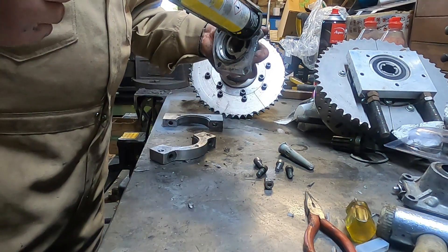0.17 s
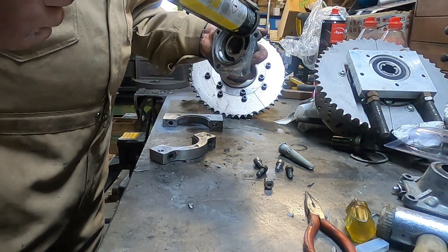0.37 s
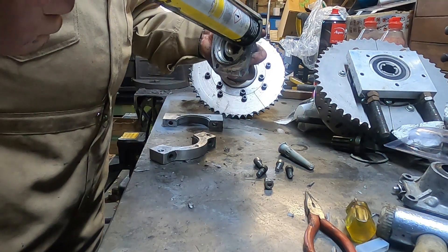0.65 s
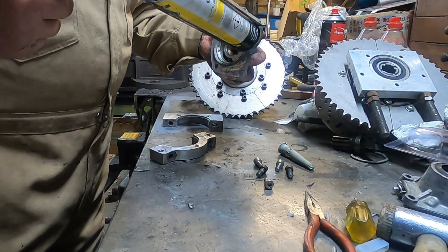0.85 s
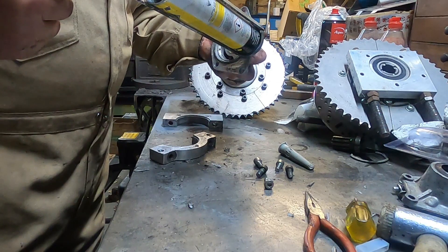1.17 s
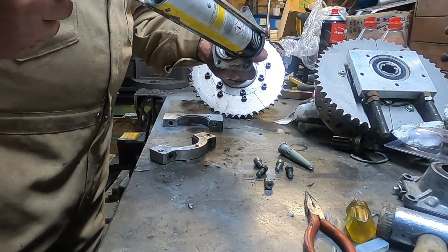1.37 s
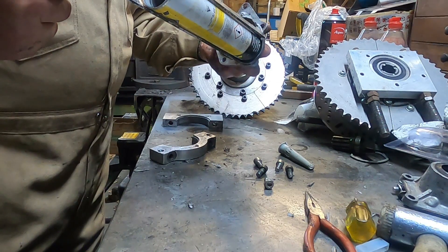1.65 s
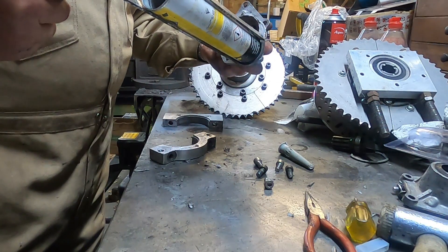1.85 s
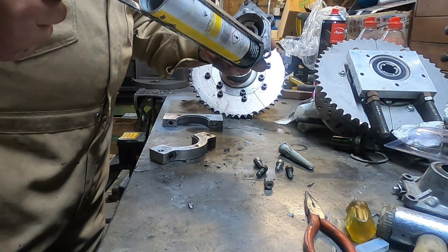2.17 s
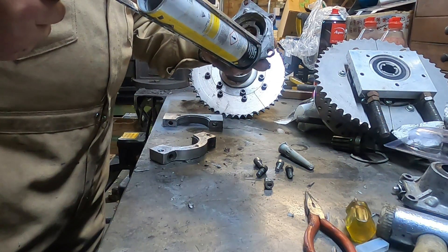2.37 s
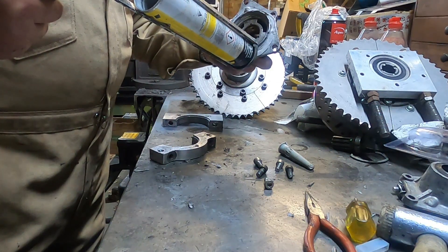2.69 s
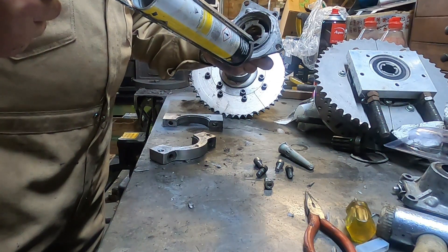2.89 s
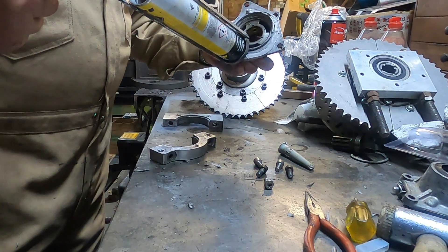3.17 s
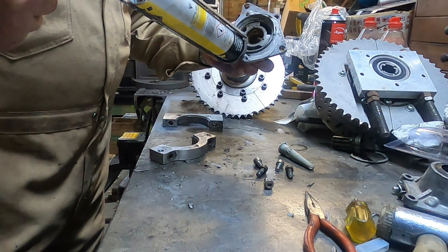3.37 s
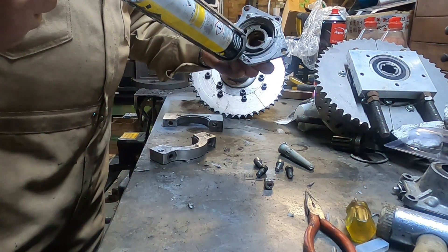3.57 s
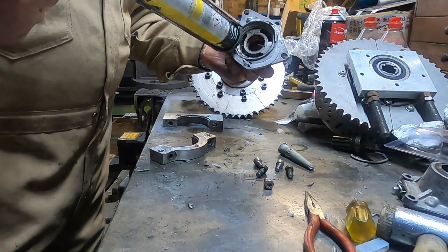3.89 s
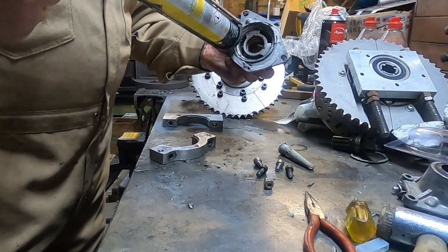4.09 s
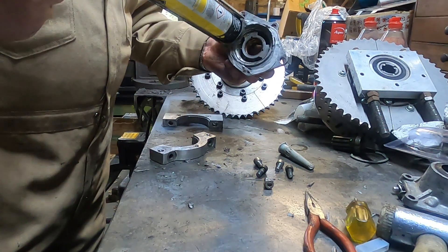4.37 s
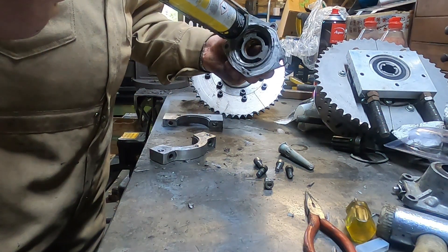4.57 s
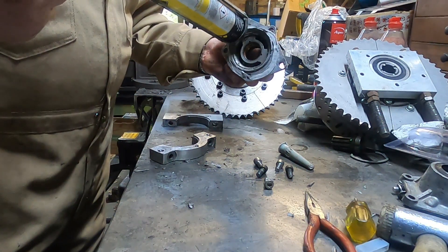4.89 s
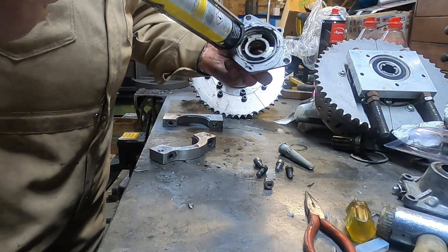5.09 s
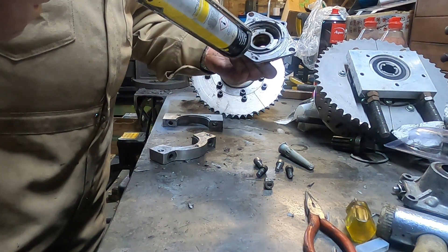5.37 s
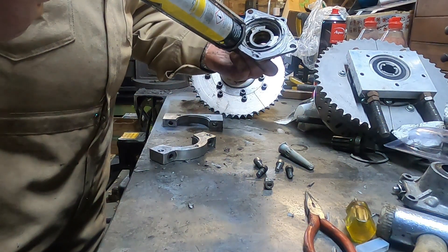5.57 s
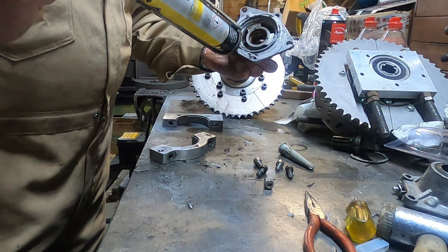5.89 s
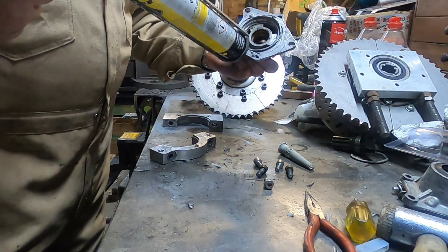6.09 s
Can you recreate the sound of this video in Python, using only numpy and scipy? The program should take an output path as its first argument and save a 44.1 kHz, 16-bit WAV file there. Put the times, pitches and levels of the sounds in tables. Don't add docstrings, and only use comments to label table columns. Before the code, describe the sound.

Close metallic clicks, short rod scrapes and dull barrel knocks from a hand-worked caulking gun, over distant sparrows, traffic rumble and room air.

```python
import sys
import numpy as np
from scipy import signal
from scipy.fft import rfft, irfft, next_fast_len
from scipy.io import wavfile
from scipy.ndimage import uniform_filter1d, map_coordinates

SR = 44100
rng = np.random.default_rng(int(sys.argv[2]) if len(sys.argv) > 2 else 0)


def magnitude_from_level(level_db):
    exponent = np.asarray(level_db, float) / 20
    return 10 ** exponent


def wav_record(signal):
    frames = np.transpose(np.atleast_2d(signal))
    bounded = np.clip(frames, -1, 1)
    quanta = np.round(bounded * 32767).astype(np.int16)
    wavfile.write(sys.argv[1], SR, quanta)


N = 275184


def unit(x):
    return x / np.sqrt(np.mean(x ** 2) + 1e-20)


def along(points, hz):
    f, v = np.transpose(points)
    return np.interp(np.log(hz + 1), np.log(f + 1), v)


def curves(rows):
    s, *cols = np.transpose(rows)
    t = np.arange(N) / SR
    inside = 1. * (t >= s[0]) * (t <= s[-1])
    return [np.interp(t, s, c) for c in cols] + [uniform_filter1d(inside, size=600)]


def wobble(rate):
    knots = rng.standard_normal(int(N * rate / SR) + 4)
    return map_coordinates(knots, [np.arange(N) * rate / SR])


def filtered(x, response):
    m = next_fast_len(N + SR // 2)
    return irfft(rfft(x, m) * response(np.fft.rfftfreq(m, 1 / SR)), m)[..., :N]


def ring(x, modes, order=1):
    def response(f):
        h = 0
        for k, (center, width, db) in enumerate(modes):
            resonance = 1j * f * width / (center * center - f * f + 1j * f * width)
            h = h + (-1) ** k * magnitude_from_level(db) * resonance
        u = f / (1.41 * modes[-1][0])
        h = h ** order / (1 - u * u + 1.5j * u) ** 2
        return h / np.sqrt(np.mean(abs(h) ** 2))
    return filtered(x, response)


def rush(spectrum, alike, patchy_db):
    z = signal.stft(rng.standard_normal((2, N)), nperseg=512)[2]
    field = uniform_filter1d(rng.standard_normal(z.shape[1:]), size=6, axis=0)
    field = uniform_filter1d(field, size=14, axis=1)
    pair = signal.istft(z * magnitude_from_level(patchy_db * unit(field)), nperseg=512)[1][:, :N]
    turn = np.arccos(np.clip(alike, -1, 1)) / 2
    colored = filtered(pair, lambda hz: magnitude_from_level(along(spectrum, hz)))
    mid, side = colored * [[np.cos(turn)], [np.sin(turn)]]
    return unit(np.array([mid + side, mid - side]))


def walls(x, decay, delay, alike, rise):
    out, step = np.zeros((2, N + SR)), SR // 4
    for start in range(0, N, step):
        hz, t, z = signal.stft(rng.standard_normal((2, SR // 3)), SR, nperseg=128)
        envelope = (1 - np.exp(-t / rise)) * magnitude_from_level(-60 * t / along(decay, hz)[:, None])
        tail = signal.istft(z * envelope, SR, nperseg=128)[1]
        tail[1] = alike * tail[0] + np.sqrt(abs(1 - alike ** 2)) * tail[1]
        wet = signal.fftconvolve(x[None, start:start + step], tail / np.linalg.norm(tail[0]), axes=1)
        out[:, start + round(delay * SR):][:, :wet.shape[1]] += wet
    return out[:, :N]


def plate(events, parts, edge_fall_db):
    force, t = np.zeros((4, 2, N + SR)), np.arange(SR // 40) / SR
    for s, db, barrel_db, frame_db, edge_db, ms in events:
        chatter = (1 - np.exp(-t / 0.00034)) / (1 + (t * 1000 / max(ms, 1)) ** 6)
        falls_db = [-700 * t + barrel_db, -1100 * t + frame_db, -800 * t, -edge_fall_db * t + edge_db + 6.5]
        shape = magnitude_from_level(db - 4.5) * chatter * magnitude_from_level(falls_db)
        i = round(s * SR)
        force[:, 0, i:][:, :len(t)] += shape * rng.standard_normal((4, len(t)))
        force[:, 1, i] = np.linalg.norm(shape, axis=1)
        force[:, 0, i] = force[:, 1, i] * [0.43, 0.13, 0.39, 0.74]
    return sum(ring(f[:, :N], part) for f, part in zip(force, parts))


def gripping_plate():
    # start_s, rod_ring_peak_db, frame_db (relative), edge_db (relative)
    snaps = [(0.602, -29.5, -12.5, -10.5), (1.0217, -32, -3.5, -4), (1.3887, -30.5, -1.5, -6),
             (1.9833, -23.5, -9.5, -9), (2.0367, -20, -7.5, -7.5), (3.0955, -25.5, -7, -5),
             (3.2842, -25, -5.5, -3.5), (3.3159, -23.5, -6.5, -5), (3.4128, -21, -7, -4.5),
             (3.493, -20, -7.5, -5.5), (3.8273, -33, 2.5, 1), (3.9672, -25.5, -4.5, -3.5),
             (4.031, -26.5, -3.5, -3), (4.1078, -29, -5, -3), (4.3899, -23.5, -4.5, -4.5),
             (4.6591, -23, -6, -6)]
    # start_s, rod_ring_peak_db, barrel_db (relative), frame_db (relative)
    ticks = [
        (1.6246, -62.5, 6, 7),
        (2.7747, -61.5, 6.5, -16),
        (5.0881, -65, -7, 17),
        (5.142, -54, -6, 2),
        (1.486, -58, -5, -8),
        (5.1597, -49, -6, -1),
        (6.0241, -58, 6.5, 10),
        (6.0503, -43.5, 2.5, -4.5),
    ]
    # center_hz, width_hz, level_db
    barrel = [(976, 182, -8), (1742, 423, 3.5), (1870, 620, -0.5)]
    frame = [(2750, 820, -3), (3050, 1104, -5)]
    rod = [(4454, 210, 1.5), (4440, 20, -1), (4695, 427, -3.5), (5600, 860, -5.5)]
    edge = [(6080, 3800, -1.5), (9320, 1200, -0.5), (9930, 230, 0), (12440, 390, -2.5)]
    events = [(*row, -11, 9.6) for row in ticks]
    for s, db, frame_db, edge_db in snaps:
        barrel_db = -12 + 1.12 * frame_db
        chatter_ms = 3.7 + 0.44 * (-19.5 - db)
        events.append((s, db, barrel_db, frame_db, edge_db, chatter_ms))
    return plate(events, (barrel, frame, rod, edge), edge_fall_db=6501.5)


def loose_plate():
    # start_s, rod_ring_peak_db, frame_db (relative), edge_db (relative)
    rattle = [(0.0014, -42, 4.5, -15), (0.0338, -33, 0, -11.5), (0.0511, -39.5, 6, -8),
              (0.0924, -36.5, 8, -5.5), (0.159, -35, 10, -4), (0.179, -31, 5.5, -7.5),
              (0.1931, -38.5, 14, -4), (0.2064, -36.5, 3, -11.5), (0.2198, -42, 12, -4),
              (0.2314, -33.5, 6.5, -8), (0.2371, -35, 6.5, -10), (0.243, -47.5, 5, -2),
              (0.2535, -31.5, 2, -12), (0.2569, -30, -3, -10.5), (0.2783, -34, 11, -6.5),
              (0.2853, -36.5, 10.5, -2.5), (0.296, -30.5, -1, -13.5), (0.309, -33.5, -6, -24),
              (0.3235, -35.5, 6, -9.5), (0.355, -24, -0.3, -5.5), (0.3848, -22.5, -1, -25.5)]
    # center_hz, width_hz, level_db
    loose_barrel = [(1750, 260, 4), (2090, 74, 2.5)]
    loose_frame = [(2630, 640, -8), (3200, 640, -3), (3860, 246, -1)]
    loose_rod = [(4300, 410, -2.5), (4700, 305, -2), (5900, 680, -6.5)]
    loose_edge = [(6330, 720, -1), (7500, 1200, 3.5), (9700, 1700, 1.5), (13500, 1100, -11)]
    events = []
    for s, db, frame_db, edge_db in rattle:
        barrel_db = -35.5 + 0.76 * (db + 33) - db
        events.append((s, db, barrel_db, frame_db, edge_db, 5.35))
    return plate(events, (loose_barrel, loose_frame, loose_rod, loose_edge), edge_fall_db=1795.0)


def slides():
    # start_s (fully on), hold_s, barrel_db, rod_ring_db (relative)
    strokes = [(1.265, .012, -62, 0.5), (2.655, .02, -67.5, -5), (2.71, .012, -92, 10),
               (2.784, 0.014, -72.5, 5), (2.812, 0.13, -76, 16), (2.969, 0.0097, -51.5, 3),
               (3.001, 0.057, -54, 3.5), (3.87, 0.0045, -58, -14.5), (3.944, 0.016, -57.5, -7),
               (4.014, .004, -52, -9), (1.502, .005, -66, -1), (4.273, 0.0056, -59, -2.5),
               (4.47, 0.038, -59, 0.5), (5.889, .004, -68.5, -5), (6.034, 0.028, -45.5, -9.5),
               (6.099, 0.026, -53.5, -10)]
    # center_hz, width_hz, level_db
    low_band = [(1670, 300, 0)]
    high_band = [(4660, 450, 0)]
    hiss = [(2700, 910, 3.5), (8430, 1800, -5)]
    grab_db_per_s, ease_db_per_s = 898, 906
    force, t = np.zeros((3, N)), np.arange(N) / SR
    lumps = unit(magnitude_from_level(1.6 * wobble(160) + 1.4 * wobble(45)))
    for s, hold, db, rod_db in strokes:
        grab_db = grab_db_per_s * np.clip(s - t, 0, 1)
        ease_db = ease_db_per_s * np.clip(t - s - hold, 0, 1)
        force += magnitude_from_level(db - grab_db - ease_db) * magnitude_from_level([[0], [rod_db], [.5 * rod_db - 7.0]])
    force = force * lumps * rng.standard_normal((3, N))
    return ring(force[0], low_band, order=2) + ring(force[1], high_band, order=2) + ring(force[2], hiss)


def knocks():
    # start_s, blow_db, shudder_t60_s, shudder_db (relative)
    blows = [
        (0.2672, -33.5, 0.036, 0.5),
        (0.5711, -32, 0.082, -13.5),
        (0.7591, -26.5, 0.023, -2.5),
    ]
    # center_hz, width_hz, level_db
    casting = [(445, 100, -5), (900, 220, 0.5), (1500, 490, 2.5), (2340, 830, 0.5), (3100, 470, -2),
               (4570, 400, 3)]
    force, t = np.zeros((2, N + SR)), np.arange(SR // 10) / SR
    for s, db, t60, shudder_db in blows:
        i = round(s * SR)
        shudder = magnitude_from_level(db + shudder_db - 60 * t / np.clip(t60, .01, .08))
        force[0, i:][:len(t)] += shudder * rng.standard_normal(len(t))
        force[0, i] -= magnitude_from_level(db + 16.5)
        force[1, i] -= np.hypot(magnitude_from_level(db + 15), np.linalg.norm(shudder))
    return ring(force[:, :N], casting)


def at_ports(near):
    # pitch_hz, left_minus_right_db
    tilt = [(60, -3.5), (180, 6), (550, -0.5), (1650, 0.5), (4970, 1.5), (15000, -9)]
    # pitch_hz, lag_rad
    lag = [(500, .1), (2000, 1), (4500, 0.87), (8000, 1), (14000, 0.45)]

    def response(hz):
        gain = magnitude_from_level(along(tilt, hz) * [[.5], [-.5]])
        return gain * np.exp(1j * along(lag, hz) * [[-.5], [.5]])
    return filtered(near, response)


def bench_and_shop(around):
    # pitch_hz, t60_s
    shop_decay = [(500, 0.33), (1300, 0.29), (3500, 0.33), (7000, 0.29), (10000, 0.15), (13500, 0.19),
                  (15500, 0.051)]
    bench_decay = [(1000, 0.066), (10000, 0.01)]
    bench = magnitude_from_level(-17.5) * walls(around, bench_decay, delay=.009, alike=.5, rise=0.00188)
    shop = magnitude_from_level(-7.5) * walls(around, shop_decay, delay=.004, alike=0.12, rise=0.001)
    return bench + shop


def sparrows():
    # start_s, length_s, start_hz, level_db
    chirps = [(0.633, 0.14, 4700, -59), (0.77, 0.067, 4600, -60), (0.844, 0.13, 4430, -66.5),
              (1.171, .13, 5180, -54), (1.434, 0.043, 4030, -59.5), (1.703, 0.019, 3830, -64),
              (1.825, 0.082, 3930, -70), (2.086, 0.038, 4890, -58), (2.313, 0.075, 5010, -62.5),
              (2.781, 0.12, 5380, -54.5), (3.625, 0.11, 5324, -55.5), (4.481, 0.11, 5260, -55),
              (5.072, 0.09, 5396, -56), (5.338, 0.11, 5410, -59.5), (5.713, .125, 5296, -56.5),
              (6.027, 0.081, 5100, -55)]
    # start_s, length_s, start_hz, end_hz, level_db
    slurs = [
        (1.92, 0.13, 5130, 3730, -61.5),
        (2.384, 0.047, 4700, 3810, -61.5),
        (4.208, 0.077, 3270, 2603, -68),
        (4.865, 0.064, 4780, 4270, -69.5),
        (4.997, 0.11, 4770, 4260, -60),
        (5.448, 0.082, 5170, 3610, -58),
    ]
    # pitch_hz, t60_s
    yard = [(2500, 0.28), (4300, 0.18), (6000, 0.18)]
    chirp_end_hz, build_up_s = 3140, .035
    calls = [(s, length, start_hz, chirp_end_hz, db) for s, length, start_hz, db in chirps]
    calls += [tuple(row) for row in slurs]
    out = np.zeros(N + SR)
    hoarse_hz = 460 * wobble(450)
    flutter = magnitude_from_level(4 * wobble(70))
    for s, length, start_hz, end_hz, db in calls:
        i, n = round(s * SR), round(length * SR)
        u = np.arange(n) / (length * SR)
        fall = u + 0.08 * np.sin(2 * np.pi * 2.6 * u + rng.uniform(0, 7.6))
        swell = np.sin(np.pi * u) ** .6
        hz = start_hz + (end_hz - start_hz) * fall + hoarse_hz[i:][:n]
        whistle = np.sin(2 * np.pi * np.cumsum(hz) / SR)
        out[i:][:n] += magnitude_from_level(db + 5.0) * swell * flutter[i:][:n] * whistle
    close = walls(out[:N], yard, delay=0, alike=0.27, rise=build_up_s)
    far_wall = walls(out[:N], yard, delay=0.05, alike=0.23, rise=build_up_s)
    return (close + magnitude_from_level(-9.0) * far_wall) * magnitude_from_level([[.7], [-.7]])


def traffic():
    # time_s, road_hum_db
    nearness = [(0.0, -69), (0.94, -69.5), (1.8, -66.5), (2.3, -69.5), (2.92, -66), (3.4, -69), (4.5, -68),
                (4.9, -68.5), (5.51, -66), (5.87, -67.5), (6.24, -60.5)]
    # pitch_hz, density_db (per Hz)
    rumble_tone = [(12, 3), (20, 7), (43, 7.5), (101, -1), (118, 3), (125, -24.5), (160, -94.5),
                   (280, -120)]
    road_tone = [(74, -89), (125, -12.5), (151, 1.5), (181, 0), (339, -10), (420, -12), (550, -15.5),
                 (920, -120)]
    road_db, _ = curves(nearness)
    rumble_db = -61 + 1.4 * (road_db - road_db.mean()) + 2.3 * wobble(1.8)
    rumble = magnitude_from_level(rumble_db) * rush(rumble_tone, alike=-0.49, patchy_db=3.5)
    road = magnitude_from_level(road_db + 3.5 + wobble(3)) * rush(road_tone, alike=0.28, patchy_db=0.5)
    return rumble + road * magnitude_from_level([[-1.1], [1.1]])


def engine_drone():
    # time_s, pitch_hz, level_db
    engine = [
        (1.3, 190.5, -91),
        (1.38, 185.8, -70),
        (2.15, 190.8, -57),
        (2.92, 190.5, -75),
        (3.09, 207.2, -94),
        (3.22, 197.5, -66.5),
        (3.72, 200.1, -61.5),
        (4.1, 199.8, -77),
    ]
    hz, drone_db, gate = curves(engine)
    uneven_db, uneven_hz = 2 * wobble(14), 9 * wobble(20)
    note = np.sin(2 * np.pi * np.cumsum(hz + uneven_hz) / SR)
    return gate * magnitude_from_level(drone_db - 2.5 + uneven_db) * note * magnitude_from_level([[-2.5], [1.5]])


def room_air():
    # pitch_hz, density_db (per Hz)
    air_tone = [(210, -15.5), (500, -8), (1120, -1), (2460, -11), (4600, -11), (7500, -20), (10000, -31.5),
                (16000, -36.5)]
    return magnitude_from_level(-69.5 + 2.0) * magnitude_from_level([[.4], [-.4]]) * rush(air_tone, alike=0.15, patchy_db=1.5)


def scene():
    near, around = loose_plate() + gripping_plate() + slides() + knocks()
    gun = at_ports(near) + bench_and_shop(around)
    return gun + sparrows() + traffic() + engine_drone() + room_air()


def roll_off(x):
    return signal.sosfilt(signal.butter(12, 16510, fs=SR, output="sos"), x)


def record(dry):
    top_hz = 16300
    mix = filtered(dry, lambda hz: hz < top_hz)
    return roll_off(mix)


dry = scene()
out = record(dry)
wav_record(out)
```